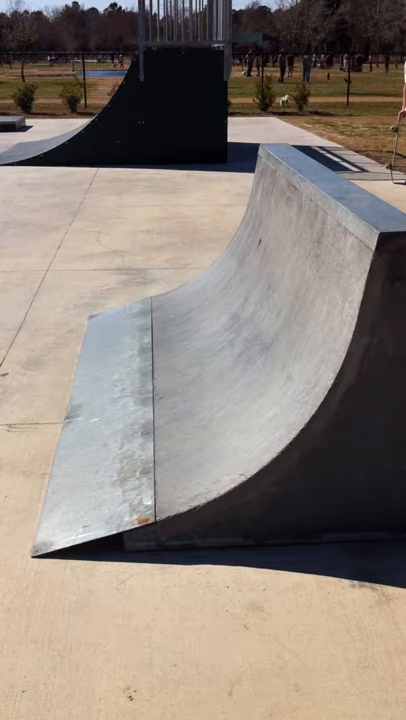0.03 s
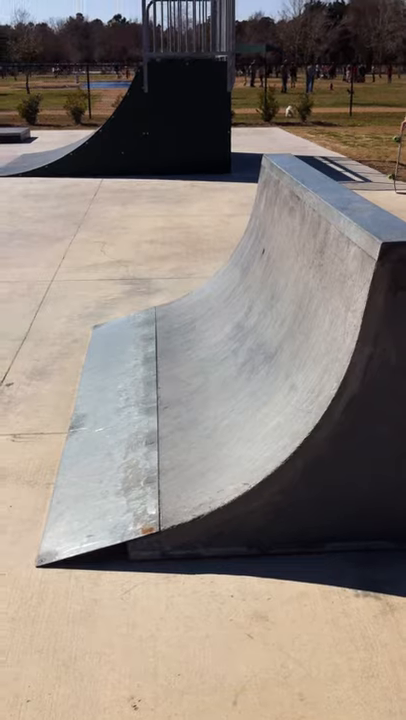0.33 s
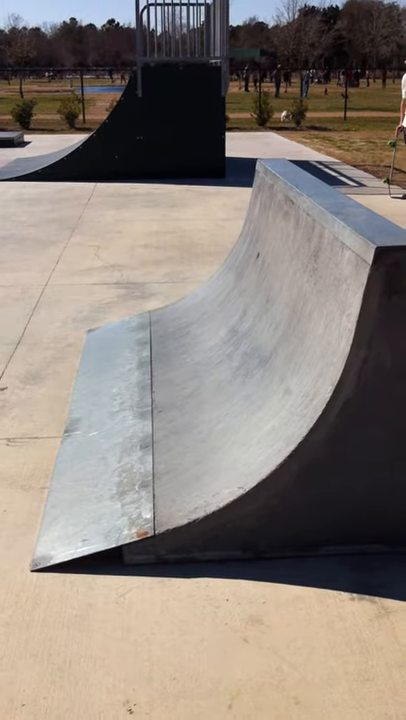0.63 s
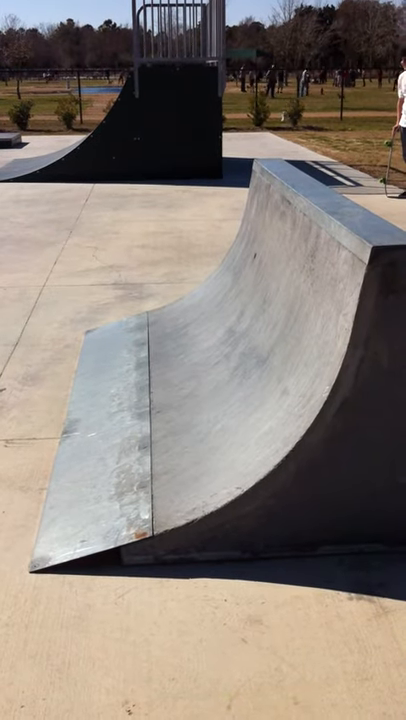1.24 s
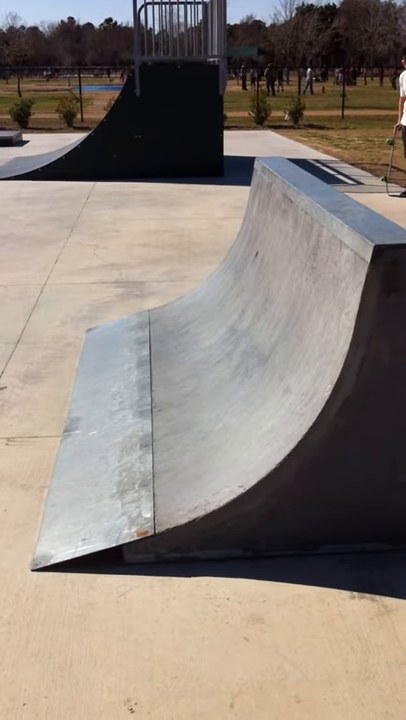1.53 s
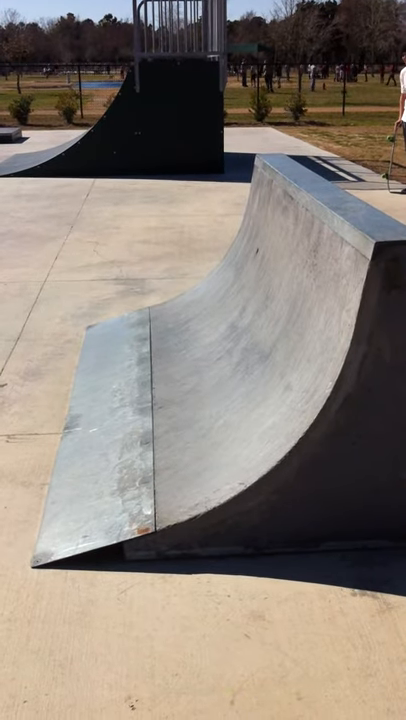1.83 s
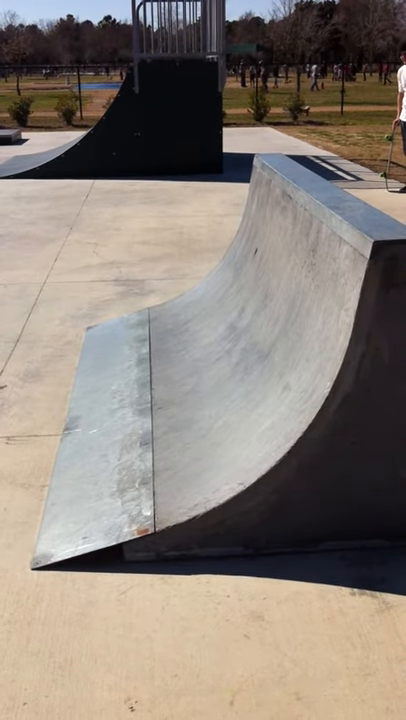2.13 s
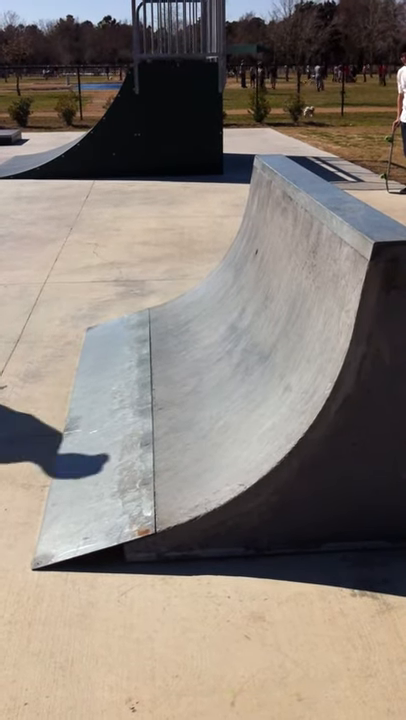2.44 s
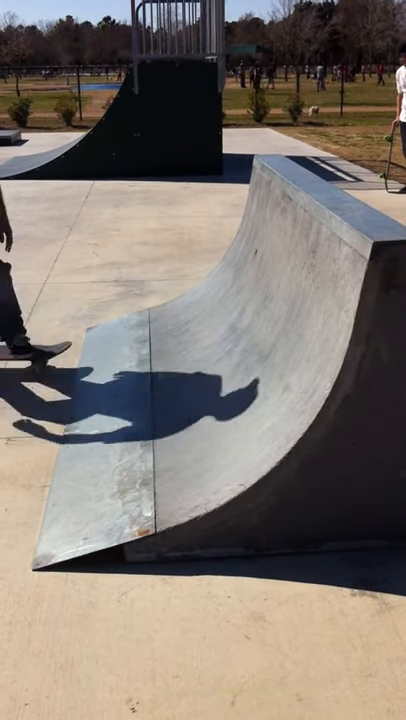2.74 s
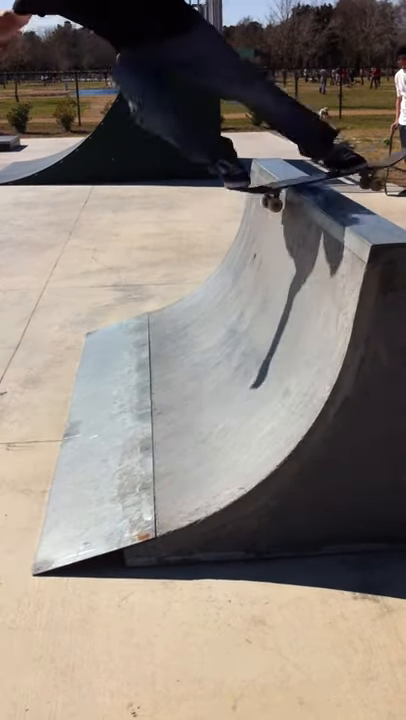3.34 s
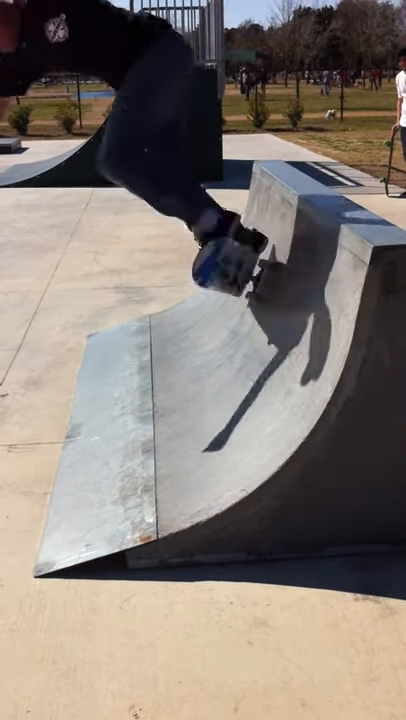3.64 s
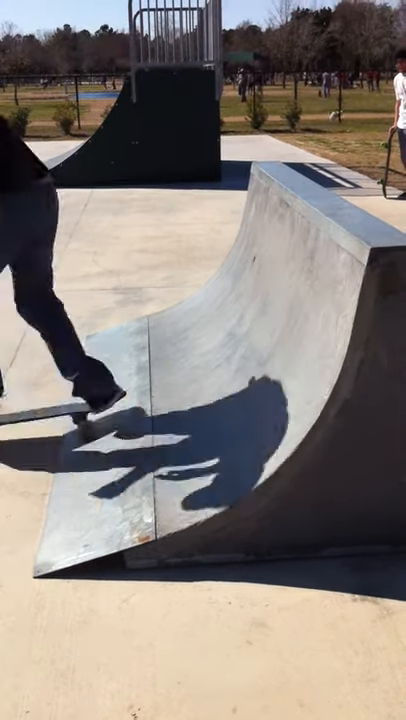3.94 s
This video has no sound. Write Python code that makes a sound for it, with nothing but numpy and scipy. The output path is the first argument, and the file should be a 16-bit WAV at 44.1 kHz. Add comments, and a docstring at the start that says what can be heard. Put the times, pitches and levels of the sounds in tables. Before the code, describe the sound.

Skateboard wheels roll, rattle a steel plate, knock, screech and slap down in gusty wind.

```python
"""An open-air skate park: a skateboard rolls up to a concrete quarter pipe, clicking over slab joints.
Each axle slams the steel kickplate, which chatters and rings. The board knocks on the coping, its wheels
stick and slip in a screech as it pivots back, and it slaps down over the plate again.
Another board clatters further off, and wind buffets the microphone throughout."""
import sys
import numpy as np
from scipy import signal
from scipy.fft import rfft, irfft
from scipy.io import wavfile
from scipy.ndimage import uniform_filter1d

SR = 44100
rng = np.random.default_rng(int(sys.argv[2]) if len(sys.argv) > 2 else 0)


def wav_record(signal):
    """Record a signal, one row per channel, as 16-bit PCM in the file named by sys.argv[1]."""
    frames = np.transpose(np.atleast_2d(signal))
    bounded = np.clip(frames, -1, 1)
    # unit amplitude maps onto the largest positive 16-bit level
    quanta = np.round(bounded * 32767).astype(np.int16)
    wavfile.write(sys.argv[1], SR, quanta)


N = 176400
T = np.arange(N) / SR
HIT_T = T[:SR]  # one second for each hit to ring out

# Axles and rebounds slamming the kickplate.
# Each row: start in seconds, level in dB, chatter length in seconds, brightness in dB per octave.
PLATE_BLOWS = [(2.971, -12, 0.025, -0.5), (2.987, -13, .007, -0.5), (3.004, -15, 0.007, 2),
               (3.053, -11.5, 0.021, 0), (3.072, -12, 0.013, 3), (3.9446, -22, 0.0078, -0.5)]
# The steel's rattle, then its strongest modes. Each row: frequency in Hz, relative level in dB.
PLATE_EQ = [(100, -34), (250, -13.5), (700, -12), (1050, -2), (1400, -14), (2600, -6.5), (3250, -8),
            (3800, 1.5), (4700, -1.5), (5400, -9.5), (6500, -14), (8000, -27), (10000, -19), (15000, -38)]
PLATE_MODES = [(950, -4), (1085, -1), (1125, -3), (1879, -8), (2164, -8), (2557, -4), (2902, -6), (3617, 1),
               (3651, -2), (3782, 1), (3851, 3), (3940, 1), (4001, -1), (4140, -1), (4330, 1), (4540, 0),
               (4591, 1), (4654, 0), (4736, -2), (5043, -4), (5420, -7), (6303, -6)]
# The fader ride that settles the rattle. Each row: time in seconds, gain in dB.
RATTLE_RIDE = [(3.255, -2.5), (3.285, -10), (3.42, -16), (3.9, 0.5)]

# Wooden hits: the deck slapping down, on the coping, over slab joints, and the far board.
# Each row: start in seconds, level in dB, brightness in dB per octave, 60 dB decay in seconds.
DECK_HITS = [(2.887, -25.5, 1.5, 0.12), (2.9705, -8.5, -1.5, 0.05), (3.9142, -6.5, 1.5, 0.043),
             (3.9256, -0.5, 1, 0.037), (3.934, -14, 1.5, 0.028), (3.978, -19, -6, 0.046)]
COPING_HITS = [(3.4343, -10, 1, 0.033), (3.4885, -40, -2, 0.032), (3.5375, -17, 4.5, 0.065),
               (3.609, -31.5, 5, 0.019)]
JOINT_HITS = [(.533, -25, 2, 0.033), (1.010, -24.5, 4, 0.055), (1.0164, -21.5, -2, 0.04),
              (1.028, -28, 2, 0.017), (2.399, -25, 3, .03)]
FAR_HITS = [(1.3035, -12.5, 3, 0.044), (1.3152, -19, 0, 0.03), (1.321, -20.5, -7.5, 0.051),
            (1.3295, -15, 0.5, 0.026), (1.343, -21, -2.5, 0.075), (1.469, -38, 0.5, 0.094)]
# The tone of each kind of crack. Each row: frequency in Hz, gain in dB.
DECK_EQ = [(40, -48), (110, -13), (200, 1), (400, 3.5), (700, -1), (1400, 5), (2400, -3.5), (3000, -14),
           (4000, -13), (5000, -7.5), (6500, -13.5), (8700, -24), (11000, -17.5), (15000, -24)]
COPING_EQ = [(40, -40), (150, -22), (330, 9), (520, -5), (760, 7.5), (1050, -3), (1450, 6), (2300, 3),
             (3500, -2), (5000, -3.5), (7000, -12), (8700, -17.5), (11000, -17), (15000, -25)]
JOINT_EQ = [(100, -23), (500, -7), (850, 10), (1400, -3), (2000, 2.5), (2900, -10.5), (4000, -7.5),
            (6500, -18.5), (8200, -15.5), (10000, -21), (15000, -44)]
FAR_EQ = [(40, -59), (200, -3), (500, -3), (800, 6.5), (1500, 7), (2000, 6.5), (2450, 9.5), (3000, -1),
          (3600, 0.5), (4700, -7), (5600, -17), (7500, -26), (9500, -25), (15000, -56)]
# The ring under each crack. Each row: frequency in Hz, relative level in dB, 60 dB decay in seconds.
DECK_MODES = [(184, -3, 0.055), (411, 7.5, 0.061), (747, 5.5, 0.11), (1274, 3.5, 0.033), (1500, 12, 0.025),
              (1820, 1, 0.019), (2330, 3, 0.058), (4800, -11, 0.01)]
COPING_MODES = [(760, -1.5, 0.032), (1386, 2.5, 0.042), (1483, 4.5, 0.044), (1640, -6, 0.047),
                (2210, -2, 0.045), (3100, -3, 0.022)]
JOINT_MODES = [(860, -2, 0.038), (1098, -2, 0.066), (1828, 2.5, 0.069), (2104, -4.5, 0.057)]
FAR_MODES = [(810, 10, 0.067), (1070, -11, .06), (1344, 6, 0.07), (1560, 2, 0.083), (2330, -4, 0.057)]

# Wheels skidding through the pivot.
# Each row: time in seconds, stick-slip rate in Hz, then the squeal, overtone and rasp faders in dB.
SKID = [(3.733, 485, -45, -52, -41), (3.741, 479, -34, -33, -30.5), (3.750, 473, -29, -20, -21),
        (3.762, 457, -22, -27, -26), (3.772, 478, -19.5, -23, -26.5), (3.786, 482, -17.5, -18.5, -20.5),
        (3.800, 450.5, -14.5, -26, -22.5), (3.806, 426, -24, -27, -43), (3.816, 420, -52, -57, -73)]
# The reedy side of the screech. Each row: multiple of the stick-slip rate, relative level in dB.
SKID_PARTIALS = [(1, -10.5), (3, -1), (4, -5), (5, -5), (6, -12), (8, -14), (10, -8.5), (11, -7.5),
                 (12, -19), (13, -16), (14, -11)]
# The truck rubbing near the coping. Each row: start in seconds, level in dB, length in seconds.
SCRAPES = [(3.247, -33.5, 0.019), (3.342, -41, 0.012), (3.469, -39.5, 0.021)]
# Far wheels squeaking. Each row: start in seconds, pitch in Hz, level in dB, length in seconds.
SQUEAKS = [(0.128, 1915, -52.5, 0.048), (0.478, 1125, -45, 0.04), (0.583, 1760, -52, 0.041)]
# Single hard thumps of wind. Each row: start in seconds, peak in dB, brightness in dB per octave.
BUFFETS = [(0.121, -15, 1.5), (0.18, -18, 5.5), (.204, -9, 2.5), (0.344, -22, 0), (.369, -17.5, 4.5),
           (.433, -19, -2.5), (0.612, -19.5, -1.5), (0.941, -14, 0.5), (1.104, -18.5, -1),
           (1.224, -18.5, 1), (1.394, -15.5, -0.5), (1.695, -20, 0.5), (1.845, -17, 0), (2.078, -20, -5),
           (2.294, -14.5, -2), (2.331, -33, 7.5), (2.466, -15.5, 4), (2.755, -19, -3), (3.592, -28, -2.5)]

# Fader rides for the wheels, a thin hiss near 9 kHz and the wind. Each row: time in seconds, gain in dB.
ROLL_RIDE = [(.12, -51), (1.0, -48), (2.0, -51.5), (2.5, -50), (2.9, -44), (3.15, -35.5), (3.35, -52),
             (3.68, -53), (3.85, -51), (4.0, -62)]
HISS_RIDE = [(.12, -94), (.4, -64.5), (.75, -68), (.93, -59), (1.2, -83), (1.55, -70), (1.88, -62.5),
             (2.15, -68.5), (2.42, -55.5), (2.7, -67), (2.95, -60), (3.3, -78)]
WIND_RIDE = [(0.13, -25), (0.16, -26.5), (0.2, -23), (0.26, -27), (0.36, -21.5), (0.58, -29), (0.61, -22),
             (0.71, -32), (0.88, -31), (0.92, -19.5), (0.98, -28.5), (1.36, -30), (1.39, -24),
             (1.54, -35.5), (1.86, -26.5), (1.88, -31.5), (2.27, -32), (2.3, -41), (2.33, -31),
             (2.48, -30.5), (2.5, -37.5), (2.57, -34.5), (2.62, -24), (2.69, -32), (2.95, -25.5),
             (3.05, -45), (3.52, -36), (3.66, -45), (3.82, -30), (3.89, -33.5), (3.93, -27.5), (3.98, -38)]
# The tone of the skid's rasp, wheels, thin hiss, big and fine eddies, open air and park reflections.
# Each row: frequency in Hz, gain in dB.
RASP_EQ = [(200, -18), (1200, 2.5), (2300, 5), (3200, -0.5), (5000, 1.5), (7000, 0), (9000, -5),
           (12000, -3.5), (15500, -13)]
ROLL_EQ = [(150, -19.5), (500, 0), (1000, 3.5), (1800, -7.5), (3000, -14), (5000, -19), (8000, -25.5),
           (15000, -30)]
HISS_EQ = [(4000, -3), (7000, -12), (8200, 0), (9400, -1.5), (10500, -11), (15500, -24)]
WIND_EQ = [(20, -68), (48, -36), (80, -18), (110, -5.5), (158, 2.5), (205, 1.5), (300, -4.5), (490, -13.5),
           (700, -26), (1200, -40.5), (2500, -59.5), (6000, -83), (15000, -105)]
FINE_EDDY_EQ = [(150, -23), (400, 1.5), (700, -3), (1100, -14.5), (2500, -25.5), (6000, -50)]
AIR_EQ = [(300, -9.5), (2000, 11.5), (4000, -1), (7000, -34), (9000, -22), (11000, -31), (15500, -22)]
PARK_EQ = [(80, 5), (330, 17), (1200, -3.5), (4000, -1.5), (12000, -5)]


def undb(db):
    """Decibels to gain."""
    return 10 ** (np.asarray(db) / 20)


def unit(x):
    """Scaled to rms 1."""
    return x / np.sqrt(np.mean(x ** 2) + 1e-18)


def ride(rows, column=1):
    """An automation lane of straight lines between the rows."""
    rows = np.array(rows)
    return np.interp(T, rows[:, 0], rows[:, column])


def add(out, start, x):
    """Mix x in at start, in seconds."""
    i = int(start * SR)
    out[i:i + len(x)] += x[:max(N - i, 0)]


def eq(x, points, tilt_db=0):
    """Minimum-phase EQ through the points, tilted per octave about 1024 Hz."""
    size = 4096
    hz, db = np.array(points).T
    octave = np.log2(np.maximum(np.arange(size // 2 + 1), .5) * SR / size)
    gain_db = np.interp(octave, np.log2(hz), db) + tilt_db * (octave - 10)
    cepstrum = irfft(np.log(undb(gain_db)))
    cepstrum[1:size // 2] *= 2  # folded forward, so nothing rings ahead of a hit
    cepstrum[size // 2 + 1:] = 0
    return signal.fftconvolve(x, irfft(np.exp(rfft(cepstrum))))[:len(x)]


def wobble(per_s):
    """Smooth random modulation with rms 1."""
    hold = max(int(SR / per_s), 1)
    steps = rng.standard_normal(N // 10)
    return unit(uniform_filter1d(steps[np.arange(N) // hold % len(steps)], hold))


def grains(per_s, spread_db, size=N):
    """Scattered clicks of uneven strength."""
    chance, strength, sign = rng.random(size), rng.standard_normal(size), rng.choice([-1, 1], size)
    return (chance < per_s / SR) * sign * undb(spread_db * np.clip(strength, -2, 2))


def texture(points, per_s, spread_db, size=N):
    """Grains through an EQ, at rms 1."""
    return unit(eq(grains(per_s, spread_db, size), points))


def decay(t60):
    """An envelope that falls 60 dB in t60 seconds."""
    return np.exp(-np.log(1000) * HIT_T / t60)


def burst(t60):
    """Countless close modes dying together as noise."""
    return unit(rng.standard_normal(SR) * decay(t60))


def kickplate():
    """Each blow sets the loose plate chattering on the concrete: a crash, a rattling tail and a ring."""
    rattles, rings = np.zeros(N), np.zeros(N)
    for start, db, length, tilt_db in PLATE_BLOWS:
        slaps = plate_chatter(length)
        crash, tail = plate_wash(slaps, t60=0.041), plate_wash(slaps, t60=0.71)
        tail = signal.lfilter(*signal.butter(1, 9000, fs=SR), tail)
        tail *= undb(-5 + 2.5 * wobble(per_s=210)[:SR])
        rattle = unit(eq(crash + tail, PLATE_EQ, tilt_db))
        ring = undb(-11) * unit(sum(undb(level) * plate_mode(slaps, hz) for hz, level in PLATE_MODES))
        gain = undb(db) / (rattle + ring)[:int(length * SR) + 1].std()
        add(rattles, start, gain * rattle)
        add(rings, start, gain * ring)
    return rattles * undb(ride(RATTLE_RIDE)) + rings


def plate_chatter(length, per_s=420, spread_db=4, release_s=0.012):
    """Steel bouncing on concrete: uneven slaps that sag over the length, then die fast."""
    gap, strength = rng.standard_normal((100, 2)).T
    when = np.cumsum(undb(4.4 * gap)) / per_s
    when = np.clip(when - when[0], 0, .5)
    slaps = np.zeros(SR)
    slaps[(when * SR).astype(int)] = undb(spread_db * np.clip(strength, -1, 1))
    return slaps * np.exp(-.6 * np.minimum(HIT_T / length, 1) - np.maximum(HIT_T - length, 0) / release_s)


def plate_wash(slaps, t60):
    """Every slap lands elsewhere and wakes other modes, so their energies add into a wash of noise."""
    energy = signal.fftconvolve(slaps ** 2, unit(decay(t60)) ** 2 / SR)[:SR]
    return rng.standard_normal(SR) * np.sqrt(abs(energy))


def plate_mode(slaps, hz):
    """One mode of the steel, driven by the slaps; higher modes die sooner."""
    t60 = 0.8 * (1000 / hz) ** 0.43
    pole = np.exp((2j * np.pi * hz - np.log(1000) / t60) / SR)
    return unit(signal.lfilter([1], [1, -pole], slaps).imag)


def deck_knocks(hits, crack_eq, modes, ring_db, contact_s):
    """Hard blows on a wooden deck: a crack, a short rattle of the trucks and the ring of the wood."""
    out = np.zeros(N)
    attack = np.minimum(HIT_T / contact_s, 1)
    for start, db, tilt_db, t60 in hits:
        crack, trucks = burst(t60), undb(-14) * burst(t60=0.39)
        blow = unit(eq((crack + trucks) * attack, crack_eq, tilt_db))
        ring = unit(sum(undb(level) * decay(ring_s) * np.sin(2 * np.pi * (hz * HIT_T + rng.random()))
                        for hz, level, ring_s in modes))
        knock = blow + undb(ring_db) * ring * attack
        rough_peak = 2.89 * knock[:SR // 200].std()  # crest factor times the rms of the first 5 ms
        add(out, start, knock * undb(db) / rough_peak)
    return out


def wheel_skid():
    """Urethane sticks and slips sideways: a gritty, reedy screech that clears into a squeal and sags."""
    slip_hz = ride(SKID) * (1 + .013 * wobble(per_s=500))
    phase = 2 * np.pi * np.cumsum(slip_hz) / SR
    squeal = unit(np.sin(2 * phase)) * undb(ride(SKID, column=2))
    partials = sum(undb(db + 4 * wobble(per_s=260)) * np.sin(multiple * phase + 2 * np.pi * rng.random())
                   for multiple, db in SKID_PARTIALS)
    overtones = unit(partials) * undb(ride(SKID, column=3))
    grit = grains(per_s=8100, spread_db=2.3) * (1 + 0.37 * np.cos(phase))  # pulses with each slip
    rasp = unit(eq(grit, RASP_EQ)) * undb(ride(SKID, column=4) + 0.5)
    gate = (T > SKID[0][0]) & (T < SKID[-1][0])
    return gate * (squeal + overtones + rasp)


def truck_scrapes():
    """The truck rubs near the coping in brief swells of metallic grit."""
    out = np.zeros(N)
    for start, db, length in SCRAPES:
        rub = texture(PLATE_EQ, per_s=2500, spread_db=2.7, size=SR)
        swell = np.exp(-2 * (HIT_T / length - .5) ** 2)
        add(out, start, rub * undb(db) * swell)
    return out


def rolling_wheels():
    """Wheels rumble over gritty concrete, with a thin hiss drifting on top."""
    grit = texture(ROLL_EQ, per_s=3000, spread_db=1.5) * undb(ride(ROLL_RIDE) + 2.2 * wobble(25.38))
    hiss = texture(HISS_EQ, per_s=3000, spread_db=4.5) * undb(ride(HISS_RIDE) + 1.1 * wobble(23.3))
    return grit + hiss


def wind():
    """Eddies thump the microphone, a few of them hard; strong gusts break into finer, brighter eddies."""
    gust_db = ride(WIND_RIDE) + 2 * wobble(per_s=45)
    fine_db = -34.5 + 1.69 * (gust_db - ride(WIND_RIDE).max())
    out = texture(WIND_EQ, per_s=1900, spread_db=2.5) * undb(gust_db - 1.5)
    out += texture(FINE_EDDY_EQ, per_s=1900, spread_db=2.5) * undb(fine_db)
    for start, db, tilt_db in BUFFETS:
        thump = eq(signal.unit_impulse(SR), WIND_EQ, tilt_db)
        add(out, start, thump / abs(thump).max() * undb(db))
    return out


def close_tick(start=.2365):
    """One dry tick right at the microphone."""
    out = np.zeros(N)
    add(out, start, undb(-19.5) * decay(t60=0.0026))
    return out


def far_squeaks():
    """Wheels further off give faint, short, wavering tones."""
    out = np.zeros(N)
    for start, hz, db, length in SQUEAKS:
        pitch_hz = hz * (1 + 0.011 * wobble(per_s=450)[:SR])
        tone = unit(np.sin(2 * np.pi * np.cumsum(pitch_hz) / SR))
        swell = np.sin(np.pi * np.minimum(HIT_T / length, 1))
        add(out, start, tone * undb(db) * swell)
    return out


def park_reflections(boards, reverb_send_db=-23, echo_send_db=-25, echo_s=.055):
    """The park returns a short, warm reverb, and the ramps one faint slapback."""
    response = eq(burst(t60=0.78), PARK_EQ) / np.sqrt(SR)
    out = undb(reverb_send_db) * signal.fftconvolve(boards, response)[:N]
    add(out, echo_s, undb(echo_send_db) * eq(boards, PARK_EQ))
    return out


def open_air():
    """A steady, quiet bed of outdoor hiss."""
    return unit(eq(rng.standard_normal(N), AIR_EQ)) * undb(-59.5)


def scene():
    """The mono mix: hits, scrapes and squeals feed the park's reflections; the rest stays dry."""
    boards = kickplate() + truck_scrapes() + wheel_skid() + far_squeaks()
    boards += deck_knocks(DECK_HITS, DECK_EQ, DECK_MODES, ring_db=-5, contact_s=0.0005)
    boards += deck_knocks(COPING_HITS, COPING_EQ, COPING_MODES, ring_db=0, contact_s=0.00046)
    boards += deck_knocks(JOINT_HITS, JOINT_EQ, JOINT_MODES, ring_db=-2.5, contact_s=0.0017)
    boards += deck_knocks(FAR_HITS, FAR_EQ, FAR_MODES, ring_db=-9, contact_s=0.00025)
    mix = boards + park_reflections(boards) + wind() + rolling_wheels() + open_air() + close_tick()
    return mix[None]


def record(dry):
    """The microphone opens after a beat of silence, rounds the loudest peaks and cuts the top."""
    open_s, top_hz = 0.12, 15800
    fade_in = np.clip((T - open_s) * SR / 100, 0, 1)
    lowpass = signal.ellip(8, .2, 80, top_hz, fs=SR, output="sos")
    return signal.sosfilt(lowpass, np.tanh(dry * fade_in))


dry = scene()
out = record(dry)
wav_record(out)
```